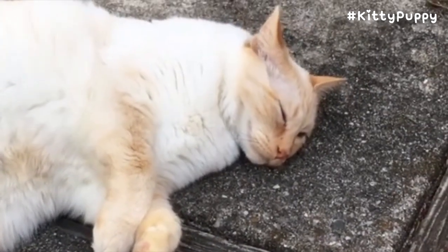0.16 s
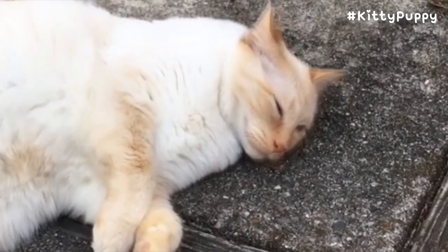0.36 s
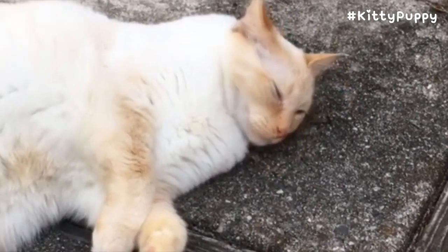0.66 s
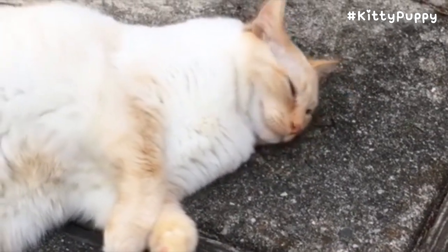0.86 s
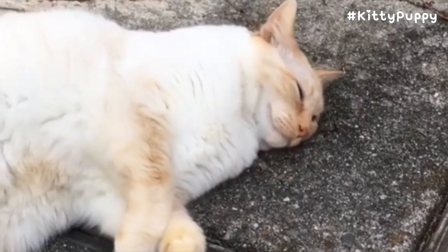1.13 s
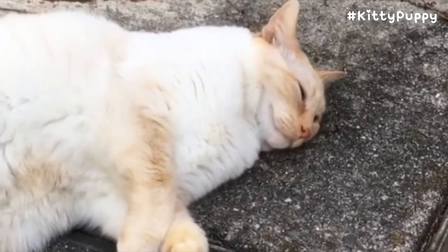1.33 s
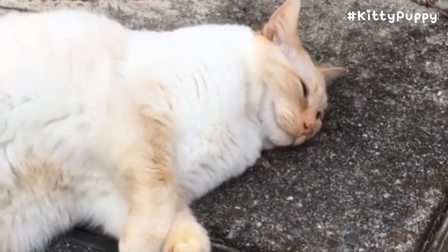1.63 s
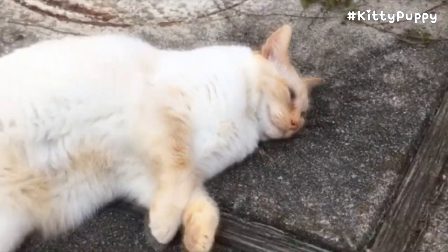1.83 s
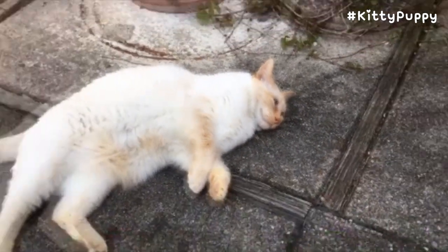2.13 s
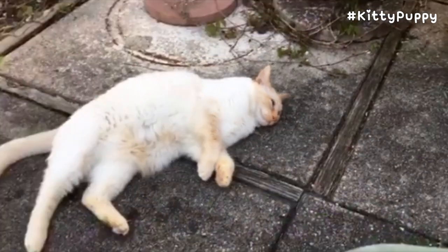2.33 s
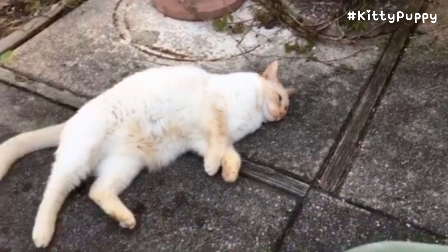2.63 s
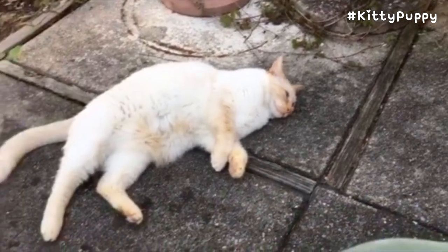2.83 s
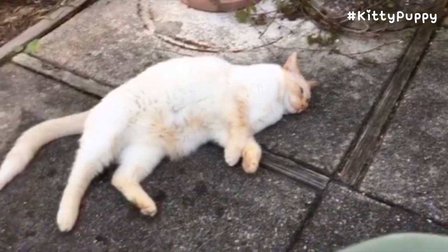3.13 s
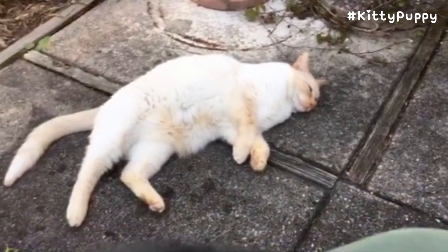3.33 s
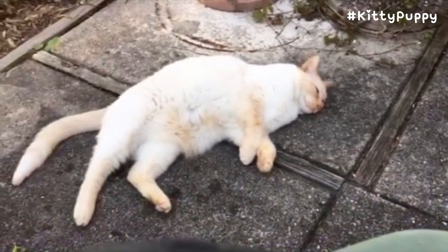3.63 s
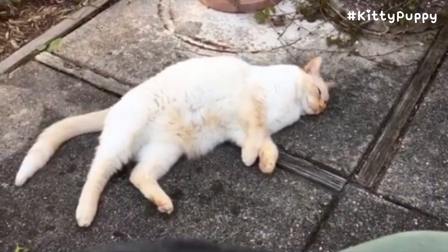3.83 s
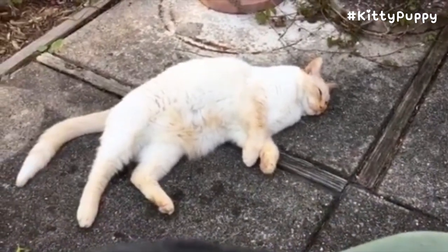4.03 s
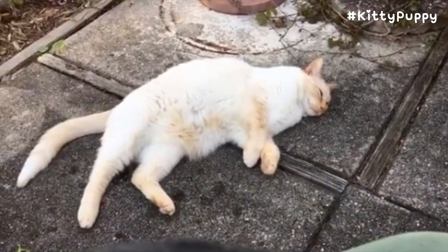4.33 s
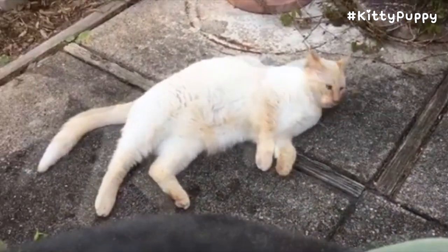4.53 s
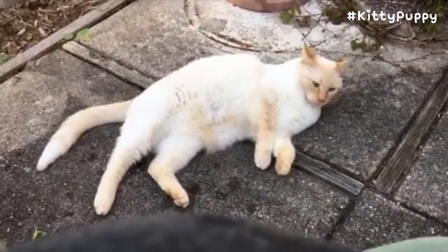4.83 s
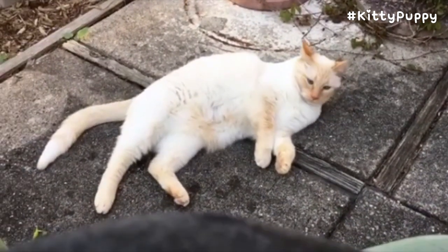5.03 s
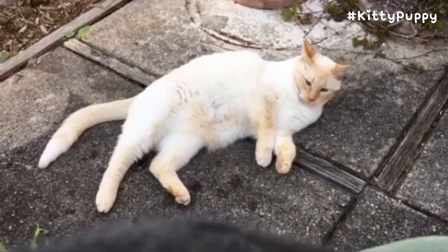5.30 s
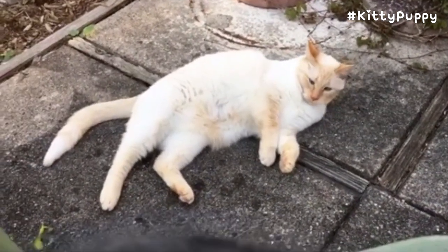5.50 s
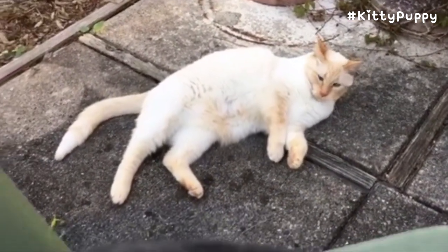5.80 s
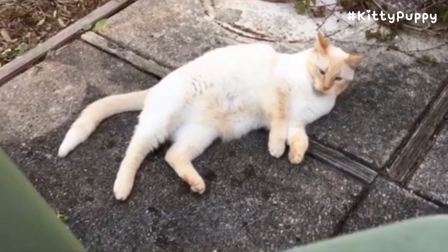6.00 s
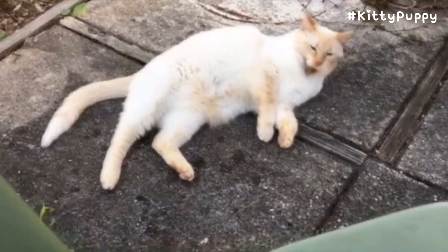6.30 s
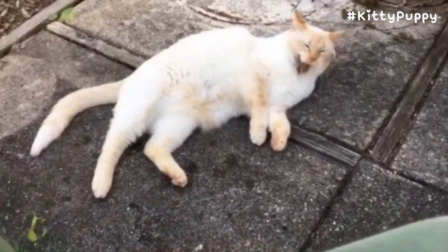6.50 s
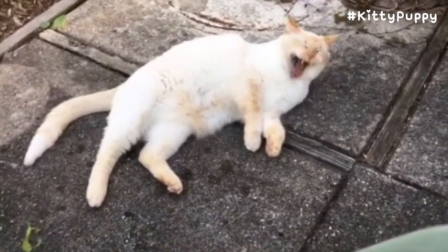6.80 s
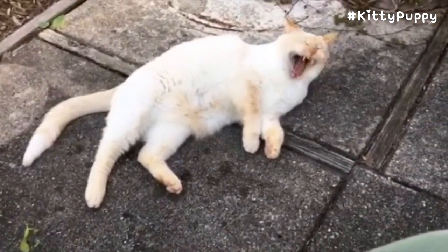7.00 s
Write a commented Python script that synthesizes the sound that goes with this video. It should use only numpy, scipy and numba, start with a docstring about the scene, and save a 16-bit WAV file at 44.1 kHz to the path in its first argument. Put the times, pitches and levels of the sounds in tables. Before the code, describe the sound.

A songbird whistles short phrases in a quiet garden, then a nearby crow caws four times over a low hum of distant traffic.

```python
"""A quiet garden on the edge of town. Far traffic hums low throughout. Over it a songbird whistles
short warbled phrases that slap back off house walls, and small birds chip further off.
At about 4.5 s everything dips briefly to near silence; the phrases stop and only single notes follow.
Then a crow caws four times close by: rough membrane pulses ringing its chest, throat and beak."""
import sys
import numpy as np
from scipy import signal
from scipy.io import wavfile
from scipy.ndimage import uniform_filter1d
from numba import njit

SR = 44100
rng = np.random.default_rng(int(sys.argv[2]) if len(sys.argv) > 2 else 0)


def dump_mix(stems):
    """Bounce the given channels to the path in sys.argv[1] as a 16-bit WAV at rate SR."""
    frames = np.atleast_2d(stems).T  # one column per channel
    limited = np.clip(frames, -1, 1)  # hard clip at full scale
    pcm = np.round(limited * 32767).astype(np.int16)
    wavfile.write(sys.argv[1], SR, pcm)


N = 315315

# the caws: onset t/s, length/s, peak level/dB, fade/(dB/s), fresh membrane rate f/Hz,
# fresh roughness (0-1), fresh and tired throat shift (1 = rest), treble flare/dB,
# open beak f/Hz, fresh and tired beak level/dB, chest level/dB
CAWS = [(4.882, 0.5, -26.5, 25, 599.4, 0.57, 1.012, 0.905, 1, 3170, -15, -13, -36),
        (5.583, 0.33, -26.5, 14.5, 604.1, 0.37, 0.99, 0.94, 5.2, 3250, -14.5, -13, -32),
        (6.226, 0.29, -26.5, 32.3, 601, .5, 1.007, 0.91, 5, 3255, -8, -19, -33),
        (6.819, 0.28, -26.5, 23, 612, 0.354, 0.998, 0.89, 4, 3297, -13, -18.5, -30.5)]
NASAL_WIDTH_HZ = 265
# the crow's throat resonances: f/Hz, width/Hz, level/dB
THROAT_FORMANTS = [(886, 960, -13.5), (1493, NASAL_WIDTH_HZ, 2), (2172, NASAL_WIDTH_HZ, -11.5),
                   (5340, 4400, -42), (2870, 580, -18), (4074, 150, -29), (4460, 820, -21),
                   (5510, 440, -23), (6000, 450, -24.5), (6750, 2500, -25.5), (8650, 460, -37.5),
                   (9300, 2000, -33), (12160, 4000, -39)]
# the songbird's three phrase shapes: t/s into the phrase, pitch f/Hz, level/dB
DIVES = [(0, 2950, -61), (.012, 3002, -44), (.026, 2898, -60), (.034, 2390, -45.5), (.06, 2050, -49.5),
         (.075, 2450, -51), (.097, 2670, -51.5), (.105, 2922, -43.5), (.184, 2967, -48.5), (.19, 2380, -44),
         (.205, 1990, -51.5), (.22, 2520, -55), (.28, 2476, -59)]
SLIDE = [(0, 2600, -61), (.015, 2950, -41), (.04, 3130, -51), (.065, 2920, -37), (.09, 2680, -42),
         (.112, 2600, -54), (.118, 2380, -41), (.14, 2110, -36.5), (.165, 2250, -40.5), (.19, 2650, -42.5),
         (.21, 2280, -43), (.25, 2170, -44), (.27, 2500, -50), (.29, 2400, -70)]
SWOOP = [(0, 3310, -55), (.016, 3865, -51), (.019, 2980, -60), (.025, 2876, -50), (.045, 2868, -47),
         (.065, 2620, -52), (.095, 2224, -47.5), (.11, 2714, -52), (.13, 2210, -40.5), (.15, 2780, -46.5),
         (.165, 2086, -46.5), (.19, 2420, -55), (.225, 2890, -46.5), (.25, 3177, -50), (.3, 3130, -66)]
# the song's cue list: phrase, trill depth/Hz, [(start t/s, gain/dB)]
SONG_CUES = [(DIVES, 15.9, [(.465, 1.8), (3.757, 3)]), (SLIDE, 54.6, [(1.06, -4.5), (4.342, -1.2)]),
             (SWOOP, 49.4, [(-.2, -0.5), (1.82, 1.5)])]
# single notes of small birds and, from 5.9 s, of the songbird:
# t/s, length/s, first f/Hz, last f/Hz, level/dB, trill depth/Hz
CHIPS = [(0.09, 0.034, 1800, 1804, -60, 60), (0.461, 0.017, 3420, 3720, -66, 100),
         (1.395, 0.18, 5240, 5260, -77, 247), (1.599, 0.16, 3750, 3960, -71.5, 80),
         (1.703, 0.0094, 5860, 7540, -57.5, 40), (1.782, 0.0079, 5800, 7170, -61, 40),
         (2.001, 0.53, 3820, 3740, -73, 120.4), (2.355, 0.076, 2420, 2710, -66, 99),
         (2.478, 0.087, 2360, 2080, -65.5, 80), (2.88, 0.083, 2510, 2565, -65.5, 79),
         (2.895, 0.12, 5640, 5430, -68.5, 298), (2.947, 0.22, 7180, 6420, -74.5, 900),
         (2.999, 0.069, 3090, 3870, -61.5, 61.4), (3.012, 0.11, 2730, 2067, -62, 40),
         (3.091, 0.12, 3650, 3680, -64.5, 298), (3.74, 0.0246, 3500, 3770, -65, 100.3),
         (4.55, 0.052, 2130, 2050, -62.5, 39.4), (5.919, 0.14, 2686, 2555, -52, 59.3),
         (5.937, 0.068, 2280, 2230, -56, 41), (6.612, .07, 2686, 2926, -50.5, 118.3),
         (6.598, 0.029, 2355, 2290, -52.5, 60), (6.668, 0.053, 2710, 2690, -53.5, 79),
         (7.052, 0.11, 2730, 3050, -48.5, 61.8)]
# tone colour of the far traffic: f/Hz, relative level/dB
TRAFFIC_SPECTRUM = [(15, -55), (25, -78), (43, -10), (106, -1.5), (175, -9), (204, -11.5), (303, -11),
                    (384, -20.5), (649, -19), (721, -16), (1040, -21), (2410, -44), (2900, -36),
                    (3770, -50), (13300, -53.5)]
# wavering hums of far engines: f/Hz, width/Hz, relative level/dB
ENGINE_HUMS = [(49, 26, -14.5), (58.6, 4.7, -6), (74.1, 3.7, -7), (102.7, 8, -5.5), (119.5, 10.5, -10),
               (212.2, 6.2, -16)]
# the low rumble's level drifts irregularly: t/s, level/dB
RUMBLE_LEVEL = [(0, -40.5), (.95, -39.5), (2.9, -40), (3.25, -43), (3.5, -38.5), (4.4, -39.5), (4.9, -37),
                (5.7, -39.5), (6.05, -46), (6.201, -39.5), (7.15, -39.5)]

CROAK_S, CROAK_DB, CROAK_BRIGHT_DB = .024, -17.5, 7  # a faint, bright croak leads into each caw
BITE_S, BITE_DB, SWELL_S = .0056, -5.5, .076  # the voice breaks in, then swells to its peak
RELEASE_DB_PER_S = 502
TIRING_S, TIRED_HZ, TIRED_ROUGH = .21, 440.2, .75  # as effort ebbs the membrane slows and roughens
BEAK_SHUT_HZ, BEAK_OPENS_S, SHUT_DROP = 3120, .018, .07  # the throat sits lower until the beak opens
FLARE_S, FLARE_WIDTH_S, DULL_DB = .076, .041, -1.5  # the treble flares around the peak
FLUTTER_HZ, FLUTTER_DEPTH, FLUTTER_BEND = 59.89, .27, .06
WEAK_PULSE_DB, SECOND_PARTIAL_DB = -3.5, -15
CHEST_WIDTH_HZ, BEAK_WIDTH_HZ, SECOND_WIDTH_HZ = 840, 310, 220
RESTLESS_DB, RESTLESS_SHIFT = 4.5, .014  # the throat never holds one shape
TRILL_HZ, SONG_LEAD_S = 69.33, .25
TRAFFIC_DB = -41.5
WALL_SLAP_S, GARDEN_T60_S = .086, .83
NEAR_T60_S, NEAR_DB = .15, 2.5  # hedges and fences scatter a dense early wash
DIP_S, DIP_FADE_S = 4.534, .035
BASS_CUT_HZ, WIDE_ABOVE_HZ, TOP_HZ = 12, 4560, 13300


def crow():
    """Uneven membrane pulses and breath, shaken by a flutter, ring chest, throat and beak."""
    db, hz, rough, shift, bright_db, beak_hz, beak_db, chest_db = caw_gestures()
    stretch, size = np.clip(rng.standard_normal((N // 40, 2)).T, -2, 2)
    flutter = np.sin(2 * np.pi * np.cumsum(FLUTTER_HZ * (1 + .22 * walk(40))) / SR)
    bent_hz = hz * (1 + FLUTTER_BEND * flutter)  # puts sidebands on each partial
    pulses = membrane(bent_hz, rough, .12 * stretch, 2.5 * size, float(undb(WEAK_PULSE_DB)))
    breath = .6 * rough * noise()
    source = (1 + FLUTTER_DEPTH * flutter) * (unit(pulses - pulses.mean()) + breath)
    voice = undb(chest_db) * ring(source, hz, CHEST_WIDTH_HZ)
    voice += undb(beak_db) * ring(source, beak_hz, BEAK_WIDTH_HZ)
    voice -= undb(SECOND_PARTIAL_DB) * ring(source, 2 * hz, SECOND_WIDTH_HZ)
    for k, (formant_hz, width, peak_db) in enumerate(THROAT_FORMANTS):
        upper = formant_hz > 2500
        centre = formant_hz * shift ** (.4 if upper else 1) * (1 + upper * RESTLESS_SHIFT * walk(9))
        gain_db = peak_db + upper * (bright_db + RESTLESS_DB * walk(12))
        voice += (-1) ** k * undb(gain_db) * ring(source, centre, width)
    gate = np.clip((db + 55) / 5, 0, 1)
    return voice * undb(db) * gate


def caw_gestures():
    """Each caw croaks, bites, swells, fades and lets go; ebbing effort slows and roughens it."""
    table = np.array(CAWS)
    which = np.clip(np.searchsorted(table[:, 0] - CROAK_S, clock()) - 1, 0, None)
    (onset, length, peak_db, fade_rate, fresh_hz, fresh_rough, fresh_shift, tired_shift,
     flare_db, open_hz, fresh_beak_db, tired_beak_db, chest_db) = table[which].T
    age = clock() - onset
    attack_db = np.interp(age, [-2 * CROAK_S, -CROAK_S, 0, BITE_S, SWELL_S],
                          [-60, CROAK_DB - 14.5, CROAK_DB, BITE_DB, 0])
    fade_db = fade_rate * np.maximum(age - SWELL_S, 0)
    release_db = RELEASE_DB_PER_S * np.maximum(age - length, 0)
    db = peak_db + attack_db - fade_db - release_db
    effort = np.exp(-(age / TIRING_S) ** 2)
    shut = np.exp(-np.maximum(age, 0) / BEAK_OPENS_S)
    flare = np.exp(-((age - FLARE_S) / FLARE_WIDTH_S) ** 2)
    croak_lift_db = CROAK_BRIGHT_DB * (age < 0)
    hz = blend(TIRED_HZ, fresh_hz, effort)
    rough = blend(TIRED_ROUGH, fresh_rough, effort)
    shift = blend(tired_shift, fresh_shift, effort) - SHUT_DROP * shut
    bright_db = DULL_DB + croak_lift_db + flare_db * flare
    beak_hz = blend(open_hz, BEAK_SHUT_HZ, shut)
    beak_db = blend(tired_beak_db, fresh_beak_db, effort) + croak_lift_db
    return db, hz, rough, shift, bright_db, beak_hz, beak_db, chest_db


@njit
def membrane(hz, rough, stretch, size_db, weak):
    """One pulse per membrane closure, every second one weaker; roughness scatters period and size."""
    pulses, phase, k = np.zeros(len(hz) + 1), 0., 0
    for i in range(len(hz)):
        step = hz[i] * (1 + rough[i] * stretch[k]) / SR
        phase += step
        if phase >= 1:
            phase, k = phase - 1, k + 1
            size = 10 ** (rough[i] * size_db[k] / 20) * (weak if k % 2 else 1.)
            pulses[i] += size * phase / step  # the closure falls between two samples
            pulses[i + 1] += size * (1 - phase / step)
    return pulses[:-1]


def songbird():
    """Three echoing phrases, each sung twice; one is already under way at the start."""
    song = sum(undb(db) * whistle(start + SONG_LEAD_S, *np.transpose(phrase), depth_hz)
               for phrase, depth_hz, cues in SONG_CUES for start, db in cues)
    echoing = garden(song, wet_db=1, slap_db=-7, treble_t60=.79)
    lead = int(SONG_LEAD_S * SR)
    return np.pad(echoing[lead:], (0, lead))


def whistle(start, times, hz, db, depth_hz):
    """A bird's near-sine tone along a pitch path, wobbling in pitch and strength."""
    t = clock() - start
    wobble = np.sin(2 * np.pi * TRILL_HZ * t) + .9 * walk(220)
    pitch = np.interp(t, times, hz) + depth_hz * wobble
    gain = undb(np.interp(t, times, db, left=-200, right=-200) + 2.14 * walk(90))
    return np.sqrt(2) * gain * np.sin(2 * np.pi * np.cumsum(pitch) / SR)


def bird_notes():
    """Short gliding whistles that sag a little in level and end on an accent."""
    progress, accent_db = np.array([0, .25, .8, 1]), np.array([2.5, 2.5, -1, 7])
    return sum(whistle(start, progress * length, blend(first, last, progress), db + accent_db, depth_hz)
               for start, length, first, last, db, depth_hz in CHIPS)


def traffic():
    """A bed of far traffic: third-octave noise bands swell together and flicker alone."""
    bed, swell_db = 0, .5 * walk(.26)
    hz_points, db_points = np.transpose(TRAFFIC_SPECTRUM)
    for hz in 28 * 2 ** (np.arange(27) / 3):
        centre = np.full(N, hz)
        db = np.interp(np.log(hz), np.log(hz_points), db_points) + swell_db + 1.2 * walk(7)
        bed += undb(db) * bandpass(bandpass(noise(), centre, hz / 3), centre, hz / 3)
    return unit(bed) * undb(TRAFFIC_DB)


def engines():
    """Far engines hum in narrow noise bands that waver in pitch and level."""
    hums = 0
    for hz, width, db in ENGINE_HUMS:
        gain = undb(db + 1.8 * walk(3.4))
        hums += gain * unit(bandpass(noise(), hz * (1 + .019 * walk(2.1)), float(width)))
    return hums * undb(np.interp(clock(), *np.transpose(RUMBLE_LEVEL)))


def garden(x, wet_db, slap_db, treble_t60):
    """Direct sound, one wall slap and a scattered tail whose treble dies first."""
    slap = np.pad(x, (int(WALL_SLAP_S * SR), 0))[:N]
    low = signal.sosfilt(signal.butter(2, 2500, fs=SR, output="sos"), noise_tail(GARDEN_T60_S))
    high = signal.sosfilt(signal.butter(2, 2500, "high", fs=SR, output="sos"), noise_tail(treble_t60))
    early = undb(NEAR_DB) * noise_tail(NEAR_T60_S)
    return x + undb(slap_db) * slap + undb(wet_db) * reverb(x, low + high + early)


def widen(x, side_db, t60):
    """Two microphone ports catch different scattered treble; the lows stay centred."""
    treble = signal.sosfilt(signal.ellip(8, .5, 85, WIDE_ABOVE_HZ, "high", fs=SR, output="sos"), x)
    side = undb(side_db) * reverb(treble, noise_tail(t60))
    return np.array([x + side, x - side])


def reverb(x, tail):
    """Smear x through a tail scaled to unit energy."""
    return signal.fftconvolve(x, tail / np.sqrt(np.sum(tail ** 2)))[:N]


def noise_tail(t60):
    """1.5 s of noise dying away at 60 dB per t60."""
    t = np.arange(int(1.5 * SR)) / SR
    return rng.standard_normal(len(t)) * undb(-60 * t / t60)


def ring(x, hz, width):
    """A resonance applied twice keeps the valleys dark."""
    return unit(bandpass(bandpass(x, hz, float(width)), hz, float(width)))


@njit
def bandpass(x, hz, width):
    """State-variable band-pass with a moving centre, gain 1 there."""
    y, band, low = np.empty(len(x)), 0., 0.
    for i in range(len(x)):
        g, damping = np.tan(np.pi * hz[i] / SR), width / hz[i]
        v = (band + g * (x[i] - low)) / (1 + g * (g + damping))
        band, low = 2 * v - band, low + 2 * g * v
        y[i] = damping * v
    return y


def walk(rate):
    """Random levels held 1 / rate s and slewed twice; spread near 1."""
    hold = int(SR / rate)
    steps = np.repeat(rng.standard_normal(N // hold + 1), hold)
    return 1.242 * uniform_filter1d(uniform_filter1d(steps, hold), hold)[:N]


def blend(a, b, amount):
    return a + (b - a) * amount


def undb(db):
    return 10 ** (np.asarray(db) / 20)


def unit(x):
    return x / np.sqrt(np.mean(x ** 2))


def noise():
    return rng.standard_normal(N)


def clock():
    return np.arange(N) / SR


def scene():
    """Birds in the garden over the town's hum; the whole mix ducks briefly before the crow."""
    t = clock()
    caws = garden(crow(), wet_db=-4, slap_db=-17, treble_t60=.8)
    song = songbird() * (t < DIP_S)
    chips = garden(bird_notes(), wet_db=.5, slap_db=-6, treble_t60=.79)
    birds = widen(caws + song + chips, side_db=-6.5, t60=.43)
    town = widen(traffic() + engines(), side_db=-3, t60=3)
    dip = np.clip(np.abs(t - DIP_S) / DIP_FADE_S, .03, 1)
    return (birds + town) * dip


def record(dry):
    """The phone drops the deepest bass and cuts the top."""
    thin = signal.sosfilt(signal.butter(2, BASS_CUT_HZ, "high", fs=SR, output="sos"), dry)
    return signal.sosfilt(signal.ellip(10, .2, 60, TOP_HZ, fs=SR, output="sos"), thin)


dry = scene()
out = record(dry)
dump_mix(out)
```